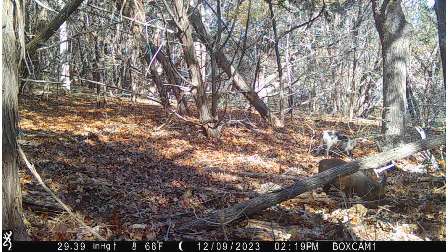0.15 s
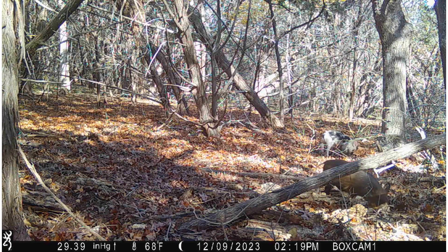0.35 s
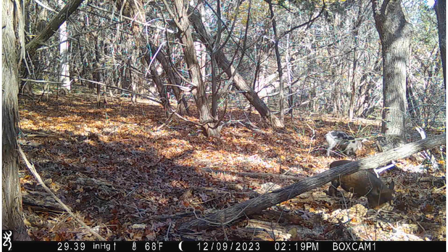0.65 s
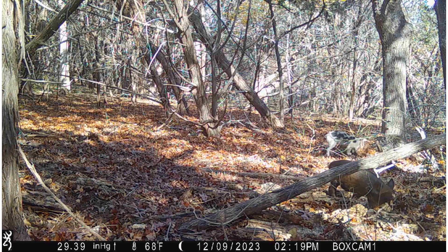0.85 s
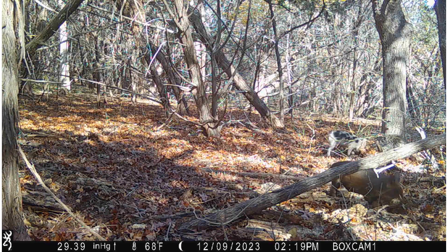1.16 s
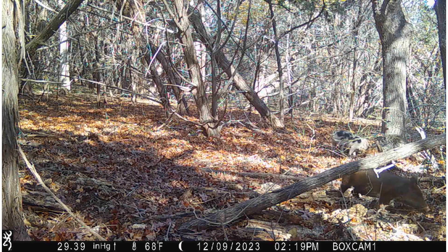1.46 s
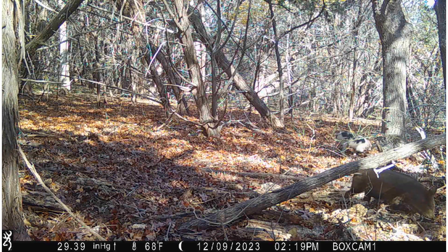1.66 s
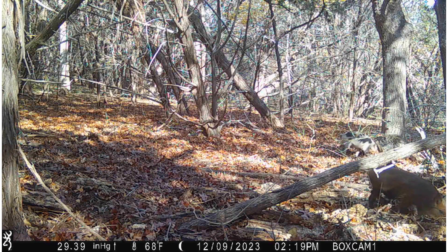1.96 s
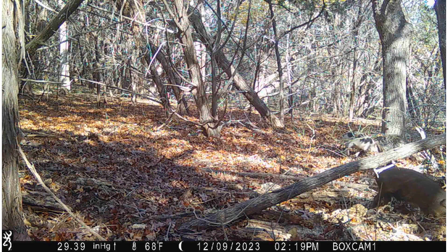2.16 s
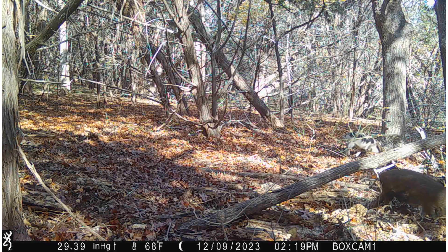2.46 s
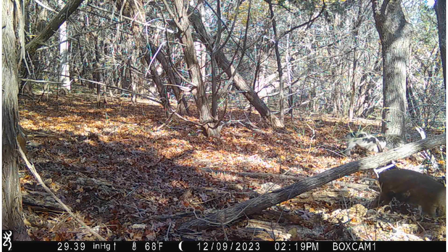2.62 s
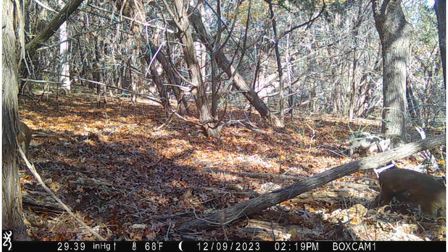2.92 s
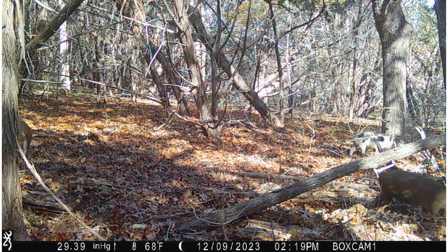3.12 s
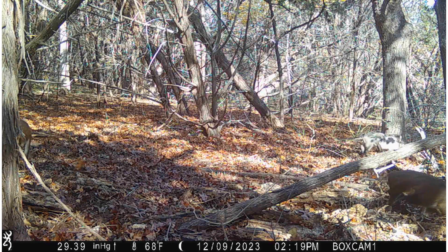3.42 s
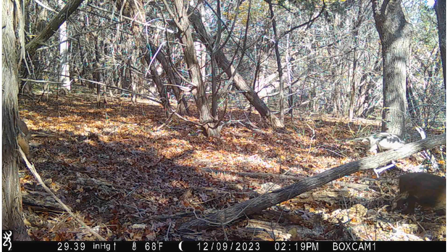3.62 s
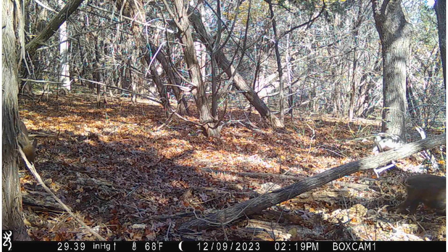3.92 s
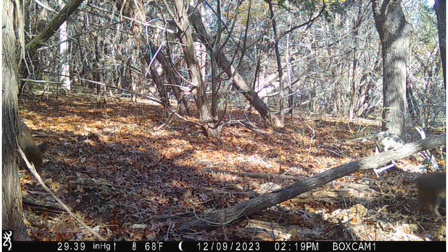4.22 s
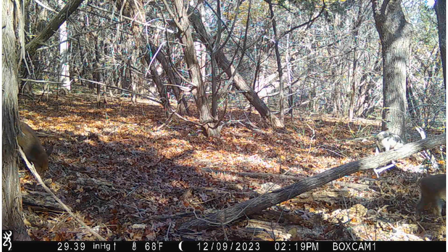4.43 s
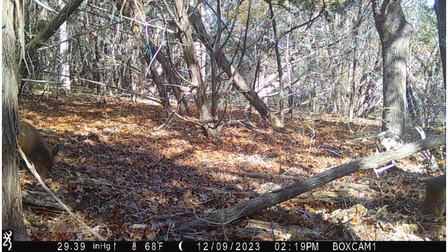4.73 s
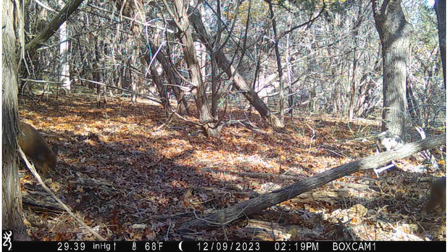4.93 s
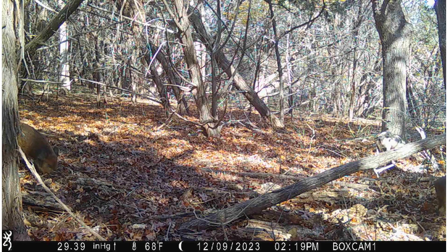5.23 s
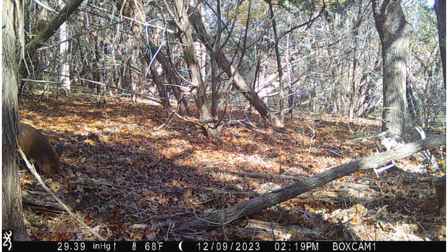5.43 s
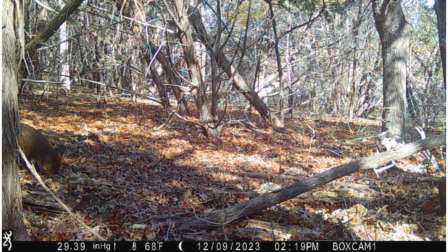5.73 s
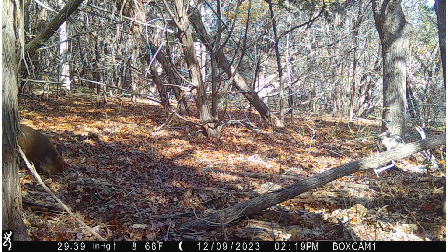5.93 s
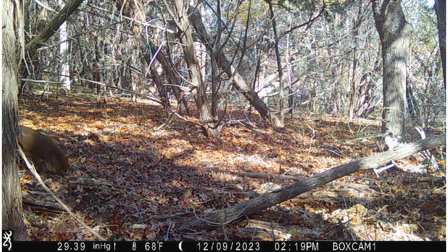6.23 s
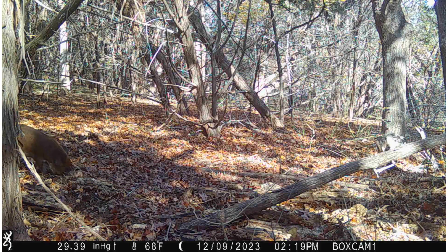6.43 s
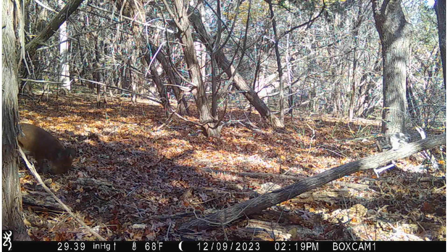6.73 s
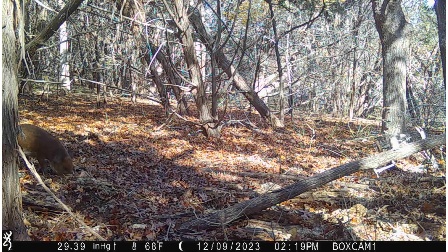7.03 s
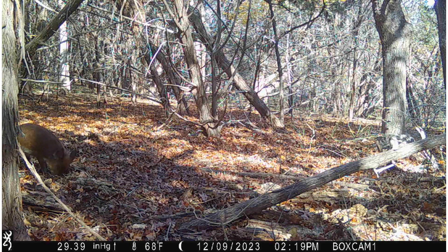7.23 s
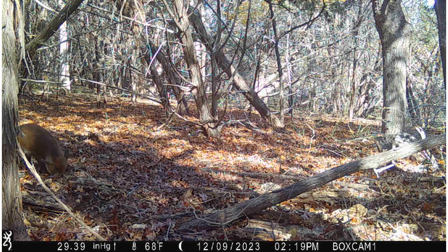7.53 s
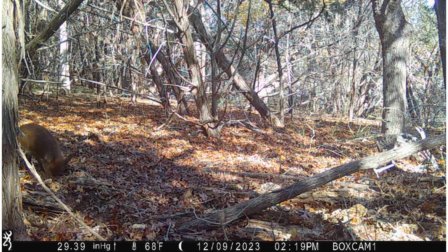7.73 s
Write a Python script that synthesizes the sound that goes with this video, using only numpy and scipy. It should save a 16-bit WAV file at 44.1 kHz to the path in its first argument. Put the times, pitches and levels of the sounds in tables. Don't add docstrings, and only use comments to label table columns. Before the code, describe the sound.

Continuous dry leaf rustle from foraging hogs, swelling and thinning irregularly as snouts push and hooves step. Sharp crisp cracks and small twig snaps stand out, with only a very short woody scatter after each. It briefly quietens, then picks up again, ending with several crunchy shoves. The slightly muffled outdoor microphone, some metres away, adds constant low-level hiss; a distant engine hums almost inaudibly.

```python
import sys
import numpy as np
from scipy import signal
from scipy.fft import rfft, irfft
from scipy.io import wavfile
from scipy.ndimage import uniform_filter1d

SR = 44100
rng = np.random.default_rng(int(sys.argv[2]) if len(sys.argv) > 2 else 0)


def dump(signal):
    limited = np.clip(np.atleast_2d(signal).T, -1, 1)
    pcm = np.round(limited * 32767).astype(np.int16)
    wavfile.write(sys.argv[1], SR, pcm)


def ratio_of_db(decibels):
    return 10 ** (np.asarray(decibels, float) / 20)


N = 347067
TIME = np.arange(N) / SR
FREQ = np.maximum(np.arange(N // 2 + 1) * SR / N, 1.)


def set_rms(x, db):
    return x * ratio_of_db(db) / np.sqrt(np.mean(x ** 2))


def colour(x, points):
    hz, db = np.transpose(points)
    gain_db = np.interp(np.log(FREQ), np.log(hz), db)
    return irfft(rfft(x) * ratio_of_db(gain_db), N)


def walk(rate_hz):
    hold = int(SR / rate_hz)
    steps = rng.standard_normal(N)[np.arange(N) // hold]
    smooth = uniform_filter1d(uniform_filter1d(steps, hold), hold)
    return smooth / np.std(smooth)


def hiss():
    # pitch_hz [Hz], density_db [dB per Hz]
    hiss_spectrum = [(15, -100), (25, -85), (82, -82.5), (210, -85), (331, -79), (600, -77), (1300, -75.3),
                     (3700, -78.3), (5700, -77), (7800, -93), (11600, -90.5), (13600, -107), (15600, -106)]
    return colour(rng.standard_normal(N) * np.sqrt(SR / 2), hiss_spectrum)


def drone():
    # time_s [s], firing_db [dB rms], second_db [dB rms]
    engine_levels = [
        (0, -67.5, -71),
        (2.7, -68, -67.5),
        (3.4, -89, -75.5),
        (5.4, -66, -78),
        (6.0, -69, -72),
        (7.1, -64, -74.5),
        (7.87, -78, -70),
    ]
    time_s, firing_db, second_db = np.transpose(engine_levels)
    firing_hz = 71.3 * (1 + .025 * walk(5.9))
    phase = 2 * np.pi * np.cumsum(firing_hz) / SR
    firing_level = np.interp(TIME, time_s, firing_db) + 2.3 * walk(4.85) - 2.5
    second_level = np.interp(TIME, time_s, second_db) + 1.9 * walk(3.4)
    lines = ratio_of_db(firing_level) * np.sin(phase) + ratio_of_db(second_level) * np.sin(2 * phase)
    return np.sqrt(2) * lines


def wood(x):
    t60_s, tail_db = .045, -11
    t = np.arange(SR // 2) / SR
    tail = rng.standard_normal(len(t)) * ratio_of_db(-60 * t / t60_s) * (t > .002)
    tail /= np.sqrt(np.sum(tail ** 2))
    return x + ratio_of_db(tail_db) * signal.fftconvolve(x, tail)[:N]


def add_fracture(track, start_s, peak_db, pitch_hz, cycles):
    turns = (np.arange(1024) - 128) * pitch_hz / SR
    steepness = np.where(turns < 0, 2.5, 1)
    swell = np.exp(-steepness * (turns / max(cycles, .5)) ** 2 * 2)
    ring = ratio_of_db(peak_db) * swell * np.cos(2 * np.pi * turns)
    i = int(start_s * SR + 1.5 * SR / pitch_hz) - 85
    track[i:i + 1024] += ring[:len(track) - i]


def leaf_snaps():
    # start_s [s], peak_db [dB], pitch_hz [Hz]
    big_snaps = [(0.414, -25, 2860), (0.4198, -20, 1650), (0.779, -24, 1940), (0.9906, -23, 3120),
                 (1.389, -30, 1920), (1.4308, -25, 2620), (1.505, -25, 2340), (1.6576, -27, 2450),
                 (1.7, -27, 3360), (2.2024, -26, 3190), (2.2573, -24, 2780), (2.3022, -22, 2720),
                 (2.4089, -27, 2990), (2.6807, -28, 1960), (3.1353, -30, 3000), (3.246, -31, 2000),
                 (3.3194, -26, 1560), (3.424, -28, 2060), (3.464, -16, 2900), (3.866, -23, 2570),
                 (4.1596, -24, 1720), (4.2043, -14.5, 2050), (4.4777, -24, 2560), (4.8546, -26, 1650),
                 (5.4826, -25, 2930), (5.516, -25, 1890), (5.656, -25, 2840), (5.831, -23, 2420),
                 (6.1729, -24, 2870), (7.241, -23.5, 2100)]
    track = np.zeros(N)
    for start_s, peak_db, pitch_hz in big_snaps:
        add_fracture(track, start_s, peak_db, pitch_hz, 1.9)
    return track


def leaf_ticks():
    # start_s [s], peak_db [dB], pitch_hz [Hz]
    crisp_ticks = [(0.1466, -10, 4900), (0.2394, -17, 5250), (0.2603, -19, 5390), (0.2962, -21, 5420),
                   (0.413, -10.5, 4700), (0.5841, -18, 4450), (0.595, -17.5, 4440), (0.6155, -18, 5400),
                   (1.337, -16.5, 5380), (1.3645, -8.5, 5000), (1.6097, -20, 5480), (1.8721, -21, 5400),
                   (1.9814, -18, 4080), (2.135, -22, 4840), (2.2019, -21, 4790), (2.2952, -18, 5640),
                   (2.6239, -19, 5300), (2.9203, -18, 5330), (3.0318, -11, 5430), (3.5877, -22, 5440),
                   (4.203, -15, 5860), (4.2732, -17, 4600), (4.927, -23, 5100), (5.5518, -22, 4400),
                   (5.7284, -20, 5440), (6.2253, -19, 5600), (6.3051, -20, 4650), (6.764, -20, 5350),
                   (6.9217, -20, 5220), (7.5423, -20, 5390)]
    hard_db, cycles_lost_per_db = -14, 0.7
    track = np.zeros(N)
    for start_s, peak_db, pitch_hz in crisp_ticks:
        late, shift = rng.random(2)
        cycles = 4.06 - cycles_lost_per_db * max(peak_db - hard_db, 0)
        add_fracture(track, start_s, peak_db - 5.5, pitch_hz, cycles)
        tear_s = start_s + .0008 + .0012 * late
        add_fracture(track, tear_s, peak_db - 6.5, pitch_hz * (.94 + .12 * shift), cycles)
    return track


def leaf_flecks():
    # start_s [s], peak_db [dB], pitch_hz [Hz]
    edge_flecks = [(0.2219, -35, 11100), (0.2394, -33, 8000), (0.24, -22.5, 11300), (0.3406, -32, 11600),
                   (0.412, -28, 10900), (0.5955, -34, 11100), (0.7602, -42, 10800), (1.2825, -32, 11600),
                   (1.696, -28, 8070), (2.1031, -43, 9260), (2.3191, -39, 11700), (2.4573, -34, 11700),
                   (2.611, -35, 9590), (2.7955, -34, 11000), (2.814, -33, 8800), (4.204, -26, 9790),
                   (4.4747, -34, 11100), (5.0823, -30, 10400), (6.134, -32, 11800), (6.2068, -33, 9880),
                   (6.2262, -32, 11600), (6.4018, -29, 10700), (6.4243, -27, 10700), (6.7705, -30, 11300),
                   (6.8892, -39, 11800)]
    track = np.zeros(N)
    for start_s, peak_db, pitch_hz in edge_flecks:
        add_fracture(track, start_s, peak_db - .5, pitch_hz, 5.)
    return track


def stem_cracks():
    # start_s [s], peak_db [dB], pitch_hz [Hz]
    brittle_stems = [(0.4958, -12, 5560), (0.5055, -17, 5300), (0.5268, -13, 4710), (0.5395, -15, 4700),
                     (0.595, -13, 4220), (0.4128, -18, 5200), (0.4158, -19, 4600), (1.3369, -18, 5400),
                     (1.343, -19, 4800), (3.1375, -19, 4200), (0.2394, -20, 6500), (5.5518, -20, 5000),
                     (0.6155, -17, 5480), (1.2964, -24, 5210), (1.9974, -19, 4590), (3.1353, -16, 2920),
                     (3.2695, -10, 5400), (3.2864, -15, 3200), (3.3104, -25, 3230), (4.4328, -30, 3890),
                     (4.448, -14, 5150), (5.4824, -23.5, 3000), (5.6854, -20, 5320), (5.8304, -25, 3000),
                     (6.8144, -20, 5560), (6.8444, -17, 2540)]
    # pitch_hz [Hz], gain_db [dB]
    housing_response = [(1, 0), (5700, 0), (7000, -10), (13000, -12), (14000, -25)]
    track = np.zeros(N)
    for start_s, peak_db, pitch_hz in brittle_stems:
        add_fracture(track, start_s, peak_db - 2., pitch_hz, 1.2)
    return colour(track, housing_response)


def stirring():
    # time_s [s], effort_db [dB], crispness_db [dB]
    snout_rooting = [(0, -41, 2.5), (.3, -41.5, 0.5), (.95, -45, 1), (1.5, -44.5, -1), (1.8, -40, -0.5),
                     (2.3, -42.5, 1.5), (2.74, -47.5, -5), (2.98, -40.5, -1), (3.85, -39.5, -3.5),
                     (4.05, -46, -3), (4.72, -40, -3), (5.18, -46, -1), (5.52, -40, -0.5),
                     (6.09, -46, -0.5), (6.26, -41, 1), (6.6, -43, 2), (7.17, -45.5, -1.5),
                     (7.87, -45.5, -4)]
    # peak_s [s], effort_db [dB], fade_s [s per 10 dB, anything below
    # .05 counts as .05], crispness_db [dB]
    hog_shoves = [(.15, -44, .1, -2), (.24, -50, 0.5, 3), (.34, -41, 0.13, 3.5), (.42, -41, 0.14, -1),
                  (.53, -44.5, 0.1, 4), (.6, -37.5, 0.07, 1.5), (.79, -38.5, 0.04, 2),
                  (1.02, -42.5, 0.08, 1.5), (1.16, -43, -0.2, 5), (1.345, -38.5, .085, 5),
                  (1.51, -45, -0.1, -1), (1.71, -38.5, -0.2, 4), (2.0, -39, .2, 2.5), (2.14, -44, 0, 0),
                  (2.27, -44.5, 0.06, 5), (2.69, -46.5, 1, -16), (3.138, -36.5, 0, -0.5),
                  (3.3, -42.5, 0.06, 6), (3.47, -40, -0.04, -1), (3.59, -38, -0.16, -3),
                  (3.74, -39, .12, -0.5), (4.21, -49, 0.28, -7), (4.49, -41, -0.37, 4),
                  (1.8, -39.5, -0.04, 0), (2.42, -45, -0.1, 0), (2.62, -54, -0.3, 2), (2.97, -40, -0.4, 0),
                  (3.03, -45, -0.15, 2), (3.92, -43, 2.1, 3),
                  (4.28, -49, -1.23, 4), (4.63, -40, -0.4, -1), (4.71, -42, -0.2, 1),
                       (4.93, -46, -0.5, 4), (5.06, -46.5, -0.17, 4), (5.3, -39.5, 0.05, -0.5),
                       (5.54, -42, -0.07, 0), (5.67, -48, .1, 1), (5.9, -44, -0.04, 5), (6.24, -44, .1, 1),
                       (6.33, -42, .12, 2), (6.76, -38.5, .11, 2.5), (6.84, -36.5, 0.1, -3),
                       (6.95, -37, 0.1, 0.5), (7.04, -36.5, .06, 2), (7.37, -41, 0.13, 2.5),
                       (7.465, -40, 0.17, -0.5), (7.69, -45, 0.5, 1.5), (7.87, -38.5, 0.1, -1)]
    rise_share = 0.78
    round_top = 0.14
    fine_per_crisp = 1
    t = TIME[::64]
    root_s, root_db, root_crisp_db = np.transpose(snout_rooting)
    columns = np.transpose(sorted(hog_shoves))[:, :, None]
    peak_s, peak_db, fade_s, peak_crisp_db = columns
    after = (t - peak_s) / np.maximum(fade_s, 1 / 20)
    after = np.where(after < 0, after / rise_share, after)
    shoves_db = peak_db - 10 * (np.hypot(after, round_top) - round_top)

    def effort(crisp_share):
        rooting_power = ratio_of_db(np.interp(t, root_s, root_db + crisp_share * root_crisp_db)) ** 2
        shove_power = np.sum(ratio_of_db(shoves_db + crisp_share * peak_crisp_db) ** 2, axis=0)
        return 10 * np.log10(rooting_power + shove_power)

    low, crisp, fine = effort(0), effort(1), effort(fine_per_crisp)
    return [np.interp(TIME, t, curve) for curve in (low, crisp - low, fine - low)]


def cracks(rate_hz, spread_db):
    happens = rng.random(N) < rate_hz / SR
    size = ratio_of_db(spread_db * rng.exponential(size=N))
    return set_rms(happens * rng.standard_normal(N) * size, 0)


def rustle():
    leaf_size_hz = [2000, 5000, 10500]
    # pitch_hz [Hz], density_db [dB per Hz]
    litter_spectrum = [(500, -17.5), (900, -4.5), (1800, 2.5), (2600, 3.5), (3600, 1.5), (5600, 3.5),
                       (6500, -7.5), (7800, -10.5), (9500, -13), (11600, -8), (12600, -18), (13800, -32),
                       (15600, -25)]
    low_db, crisp_db, fine_db = stirring()
    push_db = np.array([0 * TIME, crisp_db, fine_db])
    push_db -= push_db.mean(axis=1, keepdims=True)
    broad, broad_share = cracks(10000., .8), .35
    bursts_db = 1.1 * walk(160.) + .3 * walk(60.)
    size_octaves = np.log2(np.array(leaf_size_hz) / 2000)
    litter = 0
    for octave in np.arange(-4, 6.1) / 2:
        away = np.log2(FREQ / 2000) - octave
        band = np.cos(np.pi * np.clip(away, -.5, .5))
        own = cracks(3500. * 2 ** (octave / 2), .9)
        grains = np.sqrt(broad_share) * broad + np.sqrt(1 - broad_share) * own
        mix = [np.interp(octave, size_octaves, row) for row in np.eye(3)]
        gain_db = np.dot(mix, push_db) + bursts_db + .8 * walk(60.)
        litter = litter + ratio_of_db(gain_db) * irfft(rfft(grains) * band, N)
    return set_rms(colour(litter, litter_spectrum), 3.5) * ratio_of_db(low_db)


def scene():
    fractures = leaf_snaps() + leaf_ticks() + leaf_flecks() + stem_cracks()
    return (hiss() + drone() + wood(fractures) + rustle())[None]


def roll_off(x):
    return signal.sosfilt(signal.butter(12, 15700, fs=SR, output="sos"), x)


def record(dry):
    top_hz = 15720
    cut = colour(dry[0], [(1, 0), (top_hz, 0), (top_hz + 60, -60)])[None]
    return roll_off(cut)


dry = scene()
out = record(dry)
dump(out)
```